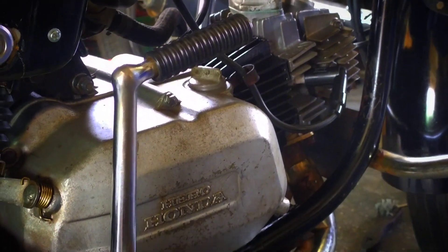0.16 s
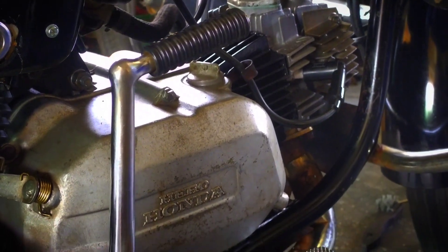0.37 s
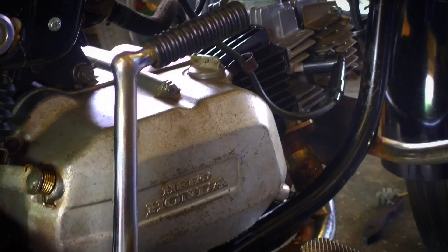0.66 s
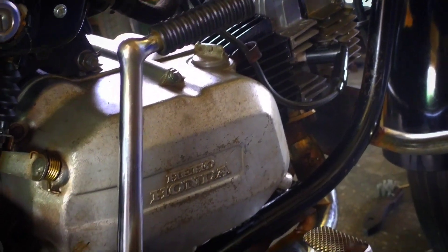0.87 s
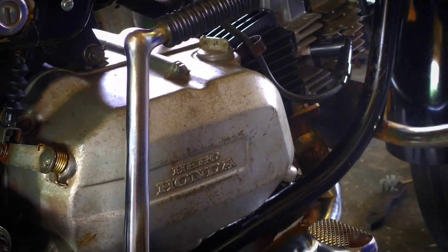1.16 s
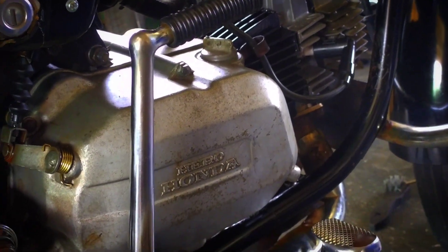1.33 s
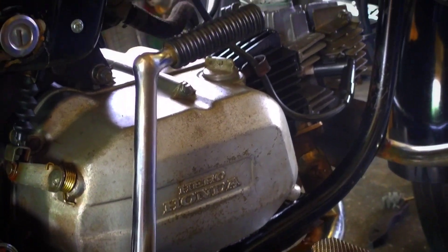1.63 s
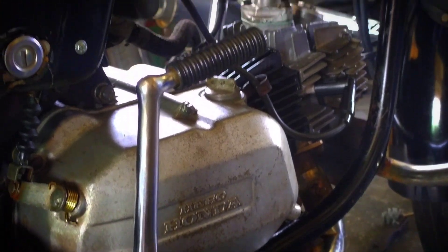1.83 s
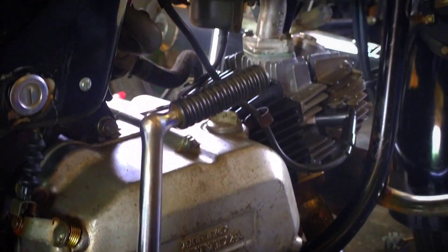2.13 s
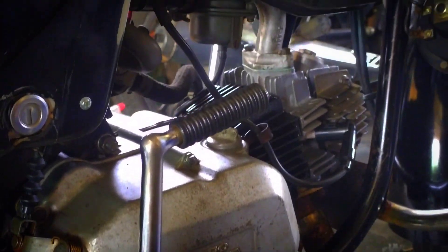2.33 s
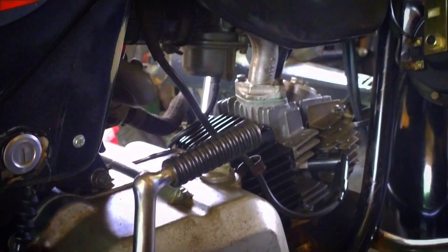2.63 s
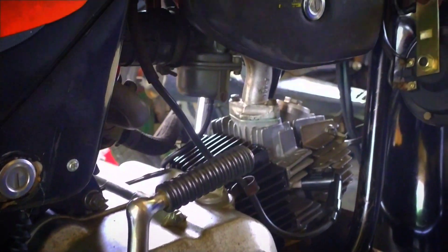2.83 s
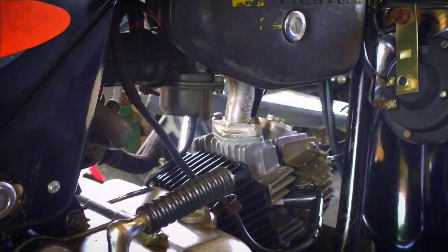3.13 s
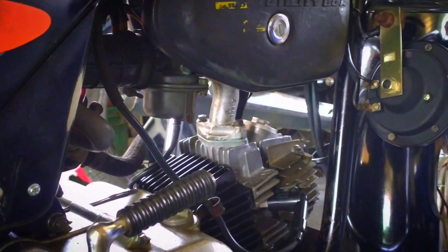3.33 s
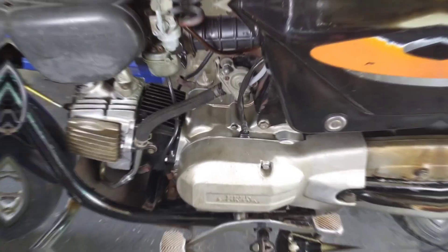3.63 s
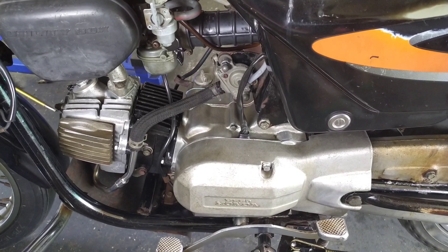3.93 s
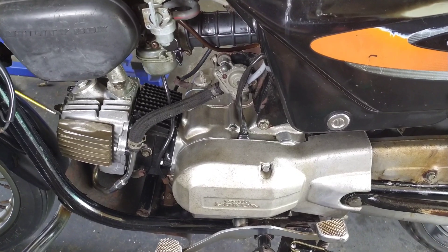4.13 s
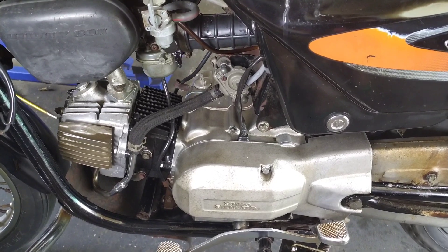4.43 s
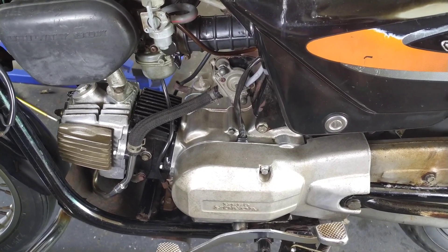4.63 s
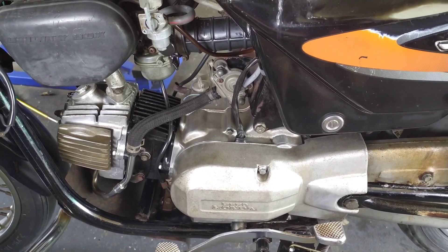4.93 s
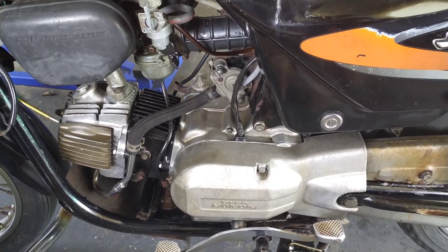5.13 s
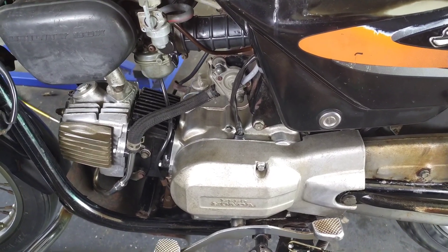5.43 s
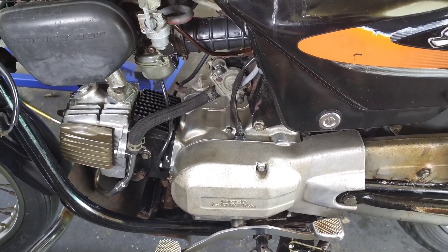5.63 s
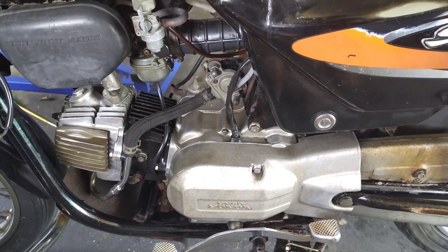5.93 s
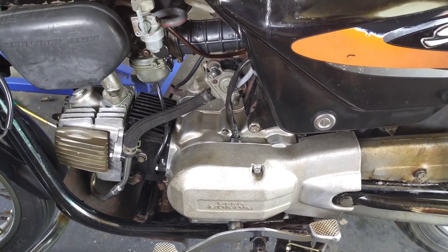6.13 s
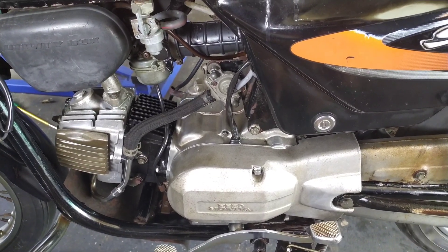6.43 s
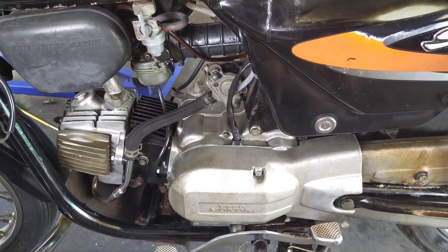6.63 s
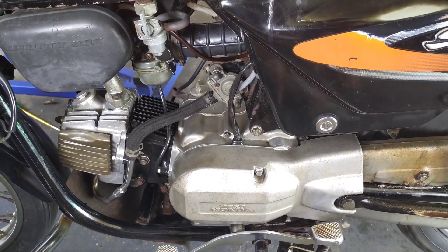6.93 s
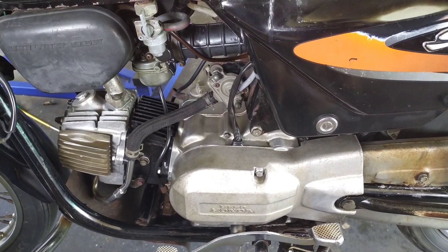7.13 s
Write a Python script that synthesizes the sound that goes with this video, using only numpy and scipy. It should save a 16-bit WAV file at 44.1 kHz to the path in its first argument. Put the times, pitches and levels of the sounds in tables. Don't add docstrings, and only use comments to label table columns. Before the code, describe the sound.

A small single-cylinder motorcycle engine idles in a workshop, heard close in stereo. From 0 to about 3 seconds it beats roughly ten times a second, a little unevenly: each firing gives a metallic knock, a bright whistling spit of leaking exhaust and a dull low thump, over dense chain and valve rattle and steady hiss. It swells slightly around 1.3 seconds, then recedes. From 3.1 it fades to near silence at 3.6 and returns by 4.1, now above the cylinder head: drier, harder knocks and clatter, less spitting gas, with occasional late or weak beats. At 5.9 the throttle snaps open; the beat nearly triples by 6.2, barking and roaring, then sags until 6.65. A second, stronger blip jumps up, dips briefly near 7.1, and climbs higher with ringing fins, cut off mid-rev at about 7.3.

```python
import sys
import numpy as np
from scipy import signal
from scipy.fft import rfft, irfft, next_fast_len
from scipy.io import wavfile
from scipy.ndimage import uniform_filter1d

SR = 44100
rng = np.random.default_rng(int(sys.argv[2]) if len(sys.argv) > 2 else 0)


def unload_audio(sound):
    columns = np.transpose(np.atleast_2d(sound))
    steps = np.round(np.clip(columns, -1, 1) * 32767)
    wavfile.write(sys.argv[1], SR, steps.astype(np.int16))


def amplitude_ratio(level_db):
    exponent = np.asarray(level_db, float) / 20
    return 10 ** exponent


N = 321489
CUT_S, OPEN_S = 3.568, 5.9
IDLE_PER_S = 10

# time in seconds, speed in firings per second.
SPEED = [(5.863, 10.2), (5.955, 10.2), (6.17, 25.4), (6.23, 28.5), (6.336, 23.8), (6.654, 18.1),
         (6.848, 34.5), (6.95, 31.3), (7.09, 29.3), (7.19, 39.4), (7.29, 44)]


def evened(x):
    return x / np.sqrt(np.mean(x ** 2) + 1e-20)


def read(points, hz):
    f, value = np.transpose(points)
    return np.interp(np.log(hz + 1), np.log(f + 1), value)


def coloured(x, gain):
    size = next_fast_len(x.shape[-1] + 4096)
    return irfft(rfft(x, size) * gain(np.fft.rfftfreq(size, 1 / SR)), size)[..., :x.shape[-1]]


def noise(t):
    return rng.standard_normal((3, len(t)))


def ring(x, modes, top_hz=5000):
    def response(hz):
        modal = sum(amplitude_ratio(db) * 1j * w * hz / (f * f - hz * hz + 1j * w * hz) for f, w, db in modes)
        return modal / (1 + 1j * hz / top_hz) ** 2
    return coloured(x, response)


def train(t, s, db):
    out = np.zeros(len(t))
    inside = (s >= t[0]) & (s < t[-1])
    out[((s[inside] - t[0]) * SR).astype(int)] = amplitude_ratio(db[inside])
    return out


def speed_at(t):
    return np.interp(t, *np.transpose(SPEED))


def answer(t, idle_db, octave_db, open_db, both_db):
    # time in seconds, opening from 0 to 1.
    throttle_hand = [(5.89, 0), (5.95, 0.48), (6.03, 0.69), (6.17, 1), (6.23, 0.9), (6.338, 0.61),
                     (6.654, 0.3), (6.76, 0.95), (6.846, 1), (6.9, 0.5), (7.09, 0.28), (7.144, .9),
                     (7.202, 0.84), (7.29, 0.67)]
    octaves = np.log2(speed_at(t) / IDLE_PER_S)
    throttle = np.clip(np.interp(t, *np.transpose(throttle_hand)), 0, 1.2)
    return idle_db + octave_db * octaves + throttle * (open_db + both_db * octaves)


def idling():
    # firing number, puff time in seconds.
    idle_marks = [(0, .026), (6, .628), (14, 1.461), (17, 1.772), (21, 2.223), (22, 2.326), (28, 2.998),
                  (32, 3.459), (33, 3.628), (37, 4.023), (41, 4.397), (47, 5.008), (53, 5.645), (55, 5.863)]
    # firing number, time lost in ms, puff in dB, thump in dB.
    weak_firings = [
        (19, 15, -1, -2),
        (28, 20, -3, -1),
        (37, 0, 0, -4),
        (43, 10, -10, -6),
        (48, 11, -3, -8),
        (49, 0, 1, -8),
    ]
    hard_knocks = [0, 3, 9, 11, 16, 17, 18, 19, 22, 23, 25, 27, 29, 30, 31, 34, 35, 37, 40, 42, 44, 45, 46,
                   47, 49, 51, 53, 55]
    marks, mark_s = np.transpose(idle_marks)
    n = np.arange(marks[-1] + 1)
    lost = sum(ms / 1000 * (n > k) for k, ms, *_ in weak_firings)
    s = np.interp(n, marks, mark_s - lost[marks.astype(int)]) + lost
    near = np.add((-26, -26, -37.5, -32), np.outer(s, (-0.89, -0.92, 1, 0.69)))
    above = (-38.5, -31, -33.5, -28)
    puff, beat, soft, strong = np.where((s < CUT_S)[:, None], near, above).T
    weak = sum(np.outer(loss_db, n == k) for k, _, *loss_db in weak_firings)
    hard = np.isin(n, hard_knocks)
    lead_ms = np.where(hard, 17, 19)
    uneven = rng.standard_normal((len(n), 4)).T * [[0.3], [1.4], [1.544], [1.0]]
    levels = [puff + weak[0], beat + weak[1], lead_ms, np.where(hard, strong, soft)]
    return np.r_[[s], uneven + levels]


def firings():
    t = np.arange(SPEED[0][0], N / SR + .05, 1 / SR)
    turns = np.cumsum(speed_at(t)) / SR
    at = t[1:][np.diff(turns // 1) > 0]
    uneven = rng.standard_normal((3, len(at)))
    puff_db = answer(at, -44, 4, 19.5, -5.5) + 2.0 * uneven[0]
    thump_db = answer(at, -36, 3.5, 9.5, -3.5) + 1.5 * uneven[1]
    knock_db = answer(at, -37, 1.5, 24, -5.5) + 1.3 * uneven[2]
    lead_ms = np.minimum(1000 * 0.31 / speed_at(at), 21)
    return np.hstack([idling(), [at, puff_db, thump_db, lead_ms, knock_db]])


def thump(clicks, pipe, lag_cycles, start_ms=3.8, crest_ms=6.23):
    ms = np.arange(SR // 8) / SR * 1000
    after = np.maximum(ms - start_ms, 0)
    wave = 0
    for k, (hz, db, rise) in enumerate(pipe):
        swell = after / rise * np.exp(1 - after / rise)
        cycles = hz * (ms - crest_ms) / 1000 - lag_cycles * k
        wave = wave + amplitude_ratio(db) * swell * np.cos(2 * np.pi * cycles)
    return signal.oaconvolve(clicks, wave)[:len(clicks)]


def burst(clicks, rise_ms, fall_ms, tail_ms, tail_db):
    ms = np.arange(SR // 8) / SR * 1000
    fall = np.exp(-ms / fall_ms) + amplitude_ratio(tail_db) * np.exp(-ms / tail_ms)
    shape = (1 - np.exp(-ms / rise_ms)) ** 2 * fall
    return signal.oaconvolve(clicks, shape / shape.max())[:len(clicks)] * noise(clicks)


def exhaust_thumps(t, s, db, pipe):
    # frequency in Hz, level in dB, rise in ms.
    open_pipe = [(87, -15, 4.7), (119, -4, 6.3), (156.3, -3.5, 13), (203, 1, 6.9), (265, -3.5, 6.3),
                 (345, -7.5, 9.7), (457.3, -3.5, 15)]
    beats = train(t, s, db)
    idle = thump(beats * (t < OPEN_S), pipe, lag_cycles=0.011)
    return idle + thump(beats * (t >= OPEN_S), open_pipe, lag_cycles=0.308)


def head_knocks(t, s, db, head, case, shape):
    blows = train(t, s, db)
    knocks = thump(blows, head, lag_cycles=0.27, start_ms=0, crest_ms=0)
    return knocks + ring(amplitude_ratio(13.5) * burst(blows, *shape), case)


def gas_puffs(t, s, db, trim_db, shape, low_hz, hiss, hiss_std, body):
    # frequency in Hz, width in Hz, level in dB.
    leak_whistle = [(6120, 130, -2.5), (7380, 330, -5), (8620, 360, -10.5), (10410, 1700, -12),
                    (12620, 650, -7), (15040, 700, 5.5)]
    puffs = burst(train(t, s, db + trim_db), *shape) / hiss_std
    puffs = coloured(puffs, lambda hz: amplitude_ratio(read(hiss, hz)) / np.sqrt(1 + (low_hz / (hz + 1)) ** 8))
    puffs = 0.88 * puffs + amplitude_ratio(4.0) * ring(puffs, leak_whistle, top_hz=11200)
    bark = burst(train(t, s, db + 9) * (t >= OPEN_S), 1.1, 4.5, 16, -12.0)
    return puffs + coloured(bark, lambda hz: amplitude_ratio(read(body, hz)))


def clatter(cycle, valves, case, body, ring_db):
    pattern_db = 0
    for at, width, db in valves:
        away = (cycle - at + .5) % 1 - .5
        pattern_db = pattern_db + db * np.exp(-.5 * (away / width) ** 2)
    pattern_db = pattern_db / np.maximum(np.gradient(cycle) * SR / IDLE_PER_S, 1) ** 0.63
    ticks = amplitude_ratio(6.5 * np.minimum(rng.exponential(1, len(cycle)), 4))
    ticks = ticks * (rng.random(len(cycle)) < 1500 / SR)
    ticks = signal.lfilter([1], [1, -np.exp(-1 / 90)], ticks)
    drive = (1.77 + evened(ticks)) * noise(cycle)
    broad = evened(coloured(drive * amplitude_ratio(0.5 * pattern_db), lambda hz: amplitude_ratio(read(body, hz))))
    return evened(broad + amplitude_ratio(ring_db) * evened(ring(drive * amplitude_ratio(pattern_db), case)))


def low_rumble(t):
    # frequency in Hz, density in dB per Hz.
    rumble_colour = [(12, -40), (20, -22.5), (81, 2), (123, -6.5), (166, -4), (273, -12.5), (500, -10),
                     (650, -23), (1100, -120)]
    return evened(coloured(noise(t), lambda hz: amplitude_ratio(read(rumble_colour, hz))))


def heard_from(t, run, pipe, case, body, hiss, valves, same, trims_db, puff_shape, knock_shape, puff_hz, head):
    s, puff_db, thump_db, lead_ms, knock_db = firings()
    cycle = np.interp(t, np.r_[s[0] - .1, s], np.arange(len(s) + 1))
    times, *levels = np.transpose(run)
    shoves = np.r_[0, s - lead_ms / 1000, N / SR]
    k = np.clip(np.searchsorted(shoves, t), 1, len(shoves) - 1)
    held = np.where(t < OPEN_S, t, (shoves[k - 1] + shoves[k]) / 2)
    clatter_db, hiss_db, rumble_db = (uniform_filter1d(np.interp(held, times, c), size=100) for c in levels)
    ring_trim, clatter_trim, hiss_trim, rumble_trim, puff_trim, knock_trim, thump_trim = trims_db
    steady = coloured(noise(t), lambda hz: amplitude_ratio(read(hiss, hz)))
    knock_s = s - lead_ms / 1000 - .001
    puff_s = np.where(s < OPEN_S, s - .0045, knock_s)

    paths = gas_puffs(t, puff_s, puff_db, puff_trim, puff_shape, puff_hz, hiss, steady.std(), body)
    paths += head_knocks(t, knock_s, knock_db + knock_trim, head, case, knock_shape)
    paths += exhaust_thumps(t, s, thump_db + thump_trim, pipe)
    paths += amplitude_ratio(clatter_db + clatter_trim) * clatter(cycle, valves, case, body, ring_trim)
    paths += amplitude_ratio(hiss_db + hiss_trim) * evened(steady)
    paths += amplitude_ratio(rumble_db + rumble_trim) * low_rumble(t)

    def alike(hz):
        return np.clip(read(same, hz), 0, 1)

    def late(hz):
        return np.exp(-2j * np.pi * np.outer([4 / SR, 0], hz))

    shared = coloured(paths[0], lambda hz: late(hz) * np.sqrt(alike(hz)))
    return shared + coloured(paths[1:], lambda hz: np.sqrt(1 - alike(hz)))


def near_exhaust(t):
    # frequency in Hz, level in dB, rise in ms.
    pipe_modes = [(46.3, -6, 14), (85, 0.5, 12.6), (167.7, 1.5, 9.3), (218, -6.5, 6.4), (300, -35, 4.7)]
    # frequency in Hz, width in Hz, level in dB.
    case_modes = [(446, 53, -27), (786, 15, -4.5), (1197, 23, 4), (1380, 7.6, 8.5), (2477, 82, 5),
                  (2730, 410, -4.5), (4045, 260, -2)]
    # frequency in Hz, level in dB, rise in ms.
    head_modes = [(1175, -10.5, 3.3), (2450, -2.5, 3.4), (2640, -29, 2), (3954, -7, 0.82)]
    # frequency in Hz, density in dB per Hz.
    body_colour = [(200, -16), (300, -2.5), (450, -10.5), (650, -5.5), (1000, -3), (1500, -3.5),
                   (2040, -15.5), (2500, -22), (3100, -5.5), (3600, -41), (4500, -18), (6000, -68)]
    hiss_colour = [(2000, -24), (3400, 3.5), (4030, -10.5), (4680, -2), (5330, -7), (7430, -3),
                   (8920, -3.5), (9900, -1.5), (14000, -20), (15000, -16), (16100, -36)]
    # share of the cycle after the puff, width as share, level in dB.
    valve_blows = [(.1, 0.064, 4.5), (.35, 0.11, 4.5), (.55, 0.018, -6.5), (.85, 0.13, 2)]
    # frequency in Hz, likeness from 0 to 1.
    likeness = [(60, 1), (150, 0.93), (380, 0.77), (950, 0.62), (2380, 0.051), (5980, 0.026),
                (15000, 0.064)]
    # time in seconds, level in dB.
    lean = [
        (0, -1.5),
        (.9, -1),
        (1.3, 1.5),
        (2.5, 0.5),
        (3.05, -4),
    ]
    s, lean_db = np.transpose(lean)
    run = np.c_[s, np.add((-34.5, -43.5, -35.5), np.outer(lean_db, (0.33, 0.91, 0.82)))]
    return heard_from(t, run, pipe_modes, case_modes, body_colour, hiss_colour, valve_blows, likeness,
                      trims_db=(-3.0, 3.5, 2.16, -0.5, 4.0, 1.5, -1.5), puff_shape=(7.0, 1.5, 12.5, -36.0),
                      knock_shape=(4.0, 6.0, 22, -14.0), puff_hz=5880, head=head_modes)


def above_head(t):
    # frequency in Hz, level in dB, rise in ms.
    pipe_modes = [(46.4, -3.5, 14), (100.6, -2, 12.6), (157.6, -3.5, 12.7), (206, -9, 6), (300, -4, 2.1)]
    # frequency in Hz, width in Hz, level in dB.
    case_modes = [(548, 25, -7.5), (757, 64, -16.5), (1009, 28.5, 3.5), (1113, 61, -6.5), (1490, 120, -5),
                  (2174, 29, -14), (2474, 43, -3.5), (2614, 450, -12), (3303, 22, -8.5), (4060, 200, -13.5),
                  (4964, 124, -13.5)]
    # frequency in Hz, level in dB, rise in ms.
    head_modes = [(1004, 1.5, 4.5), (1472, -29.5, 7.1), (2447, 0.5, 3.2), (2675, -16.5, 2),
                  (3074, -13, 6.9)]
    # frequency in Hz, density in dB per Hz.
    body_colour = [(150, -7.5), (220, -3.5), (400, -16.5), (650, -5), (1150, -3.5), (1800, -7.5),
                   (2300, -11.5), (3100, -11), (3700, -21), (6000, -31.5)]
    hiss_colour = [(2500, -9), (3500, -7.5), (4100, -9), (4670, -11), (5190, -11.5), (6460, -12.5),
                   (8000, -11), (10100, -6.5), (12000, -17), (15000, -33), (16100, -28)]
    # share of the cycle after the puff, width as share, level in dB.
    valve_blows = [(.12, 0.14, 5.3), (.37, 0.057, 7.6), (.55, 0.025, 2.5), (.83, 0.11, 5.7)]
    # frequency in Hz, likeness from 0 to 1.
    likeness = [(60, 1), (150, 0.85), (380, 1), (950, 0.92), (2380, 0.021), (5980, 0.04), (15000, 0.31)]
    idle_db = (-32, -44.5, -38)
    settle = [(4.48, *np.add(idle_db, (1.15, 2, -1))), (4.34, *idle_db), (SPEED[0][0], *idle_db)]
    s = np.arange(OPEN_S, N / SR, .005)
    blips = np.c_[s, answer(s, -31.5, 8.5, 4.5, -1.53), answer(s, -45, 12, 7.5, -3.5), answer(s, -39, 4, 13, -2)]
    return heard_from(t, np.r_[settle, blips], pipe_modes, case_modes, body_colour, hiss_colour,
                      valve_blows, likeness,
                      trims_db=(0.5, 0.94, -1.3, -3.0, 4.0, 1.45, -1.5), puff_shape=(2.0, 1.0, 32, -22.0),
                      knock_shape=(9.0, 9.0, 8, -9.0), puff_hz=4060, head=head_modes)


def rev_roar(t):
    # frequency in Hz, level in dB.
    roar_colour = [(40, -41), (92, -0.5), (125, -2), (165, -3), (210, 0.5), (280, -7), (360, -5),
                   (520, -19)]
    speed = speed_at(t)
    turns = np.cumsum(speed) / SR
    start = rng.random(16)
    roar = 0
    for k in range(3, 16):
        roar = roar + amplitude_ratio(read(roar_colour, k * speed)) * np.sin(2 * np.pi * (k * turns + start[k]))
    hum = amplitude_ratio(answer(t, -46.5, 2.5, -46.5, 35)) * np.sin(2 * np.pi * 2 * turns)
    fused = np.maximum.accumulate(np.interp(speed, (20, 26), [0, 1]))
    return np.sqrt(2) * fused * (hum + amplitude_ratio(answer(t, -45, 5, 3, 3)) * roar)


def fins(t):
    # frequency in Hz, width in Hz, level in dB.
    fin_modes = [(454, 37, -9), (1970, 29, -8.5), (2432, 85, -1.5), (2720, 93, -6)]
    shared, *own = amplitude_ratio(answer(t, -46, 14.5, 9.5, -5)) * evened(ring(noise(t), fin_modes))
    return .75 * shared + 0.64 * np.array(own)


def scene():
    before, after = np.split(np.arange(N) / SR, [round(CUT_S * SR)])
    return np.hstack([near_exhaust(before), above_head(after) + rev_roar(after) + fins(after)])


def roll_off(x):
    return signal.sosfilt(signal.butter(12, 16280, fs=SR, output="sos"), x)


def record(dry):
    # frequency in Hz, left minus right in dB.
    mic_tilt = [(60, 0.7), (290, 0), (640, -0.5), (1410, 1.5), (3100, 0.5), (6820, 0), (10300, -0.5),
                (11800, 9.5)]
    fade = np.clip(abs(np.arange(N) / SR - CUT_S) / .5, 0, 1)
    full = np.tanh(dry * fade / 1.563) * 1.619
    full = full + amplitude_ratio(-82.0) * rng.standard_normal(dry.shape)

    def microphones(hz):
        top = (hz < 16200) / (1 + (hz / 15600) ** 36)
        return amplitude_ratio(np.outer([.5, -.5], read(mic_tilt, hz))) * top

    return roll_off(np.clip(coloured(full, microphones), -1, 1))


dry = scene()
out = record(dry)
unload_audio(out)
```